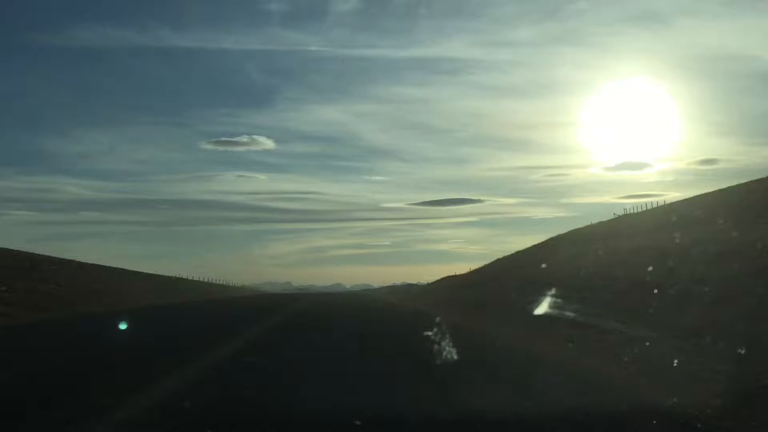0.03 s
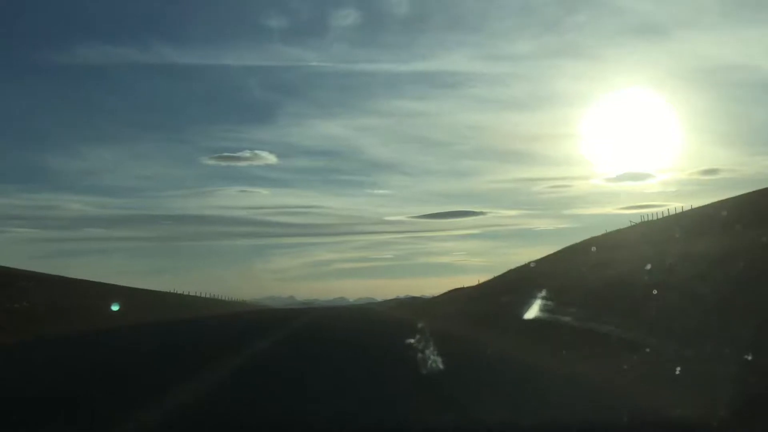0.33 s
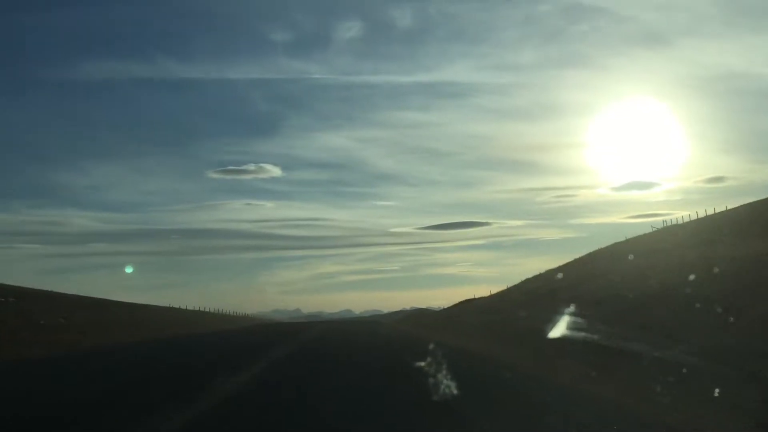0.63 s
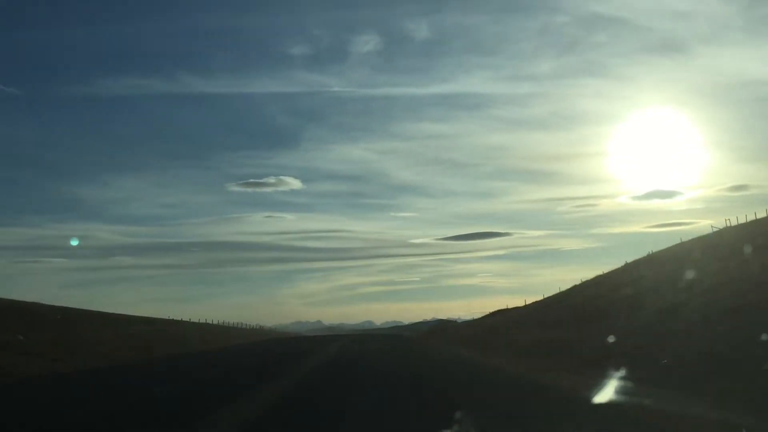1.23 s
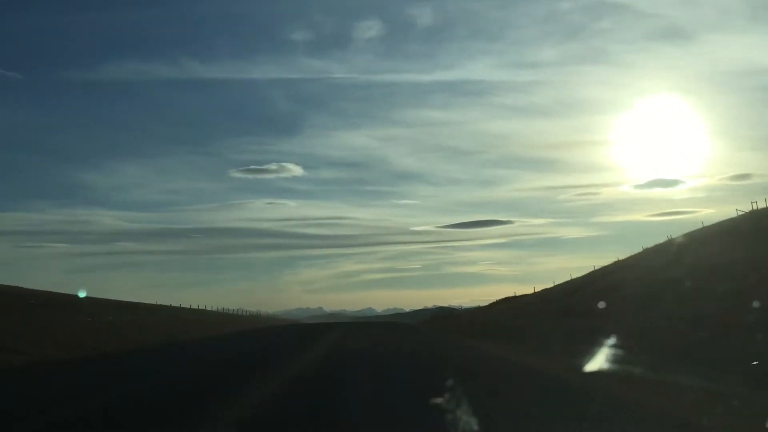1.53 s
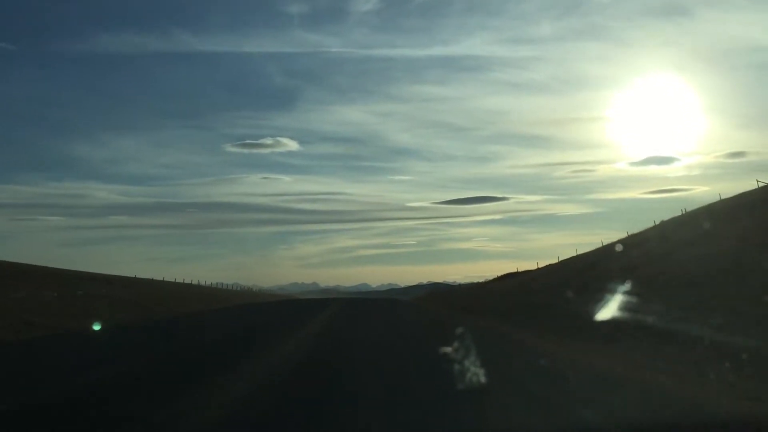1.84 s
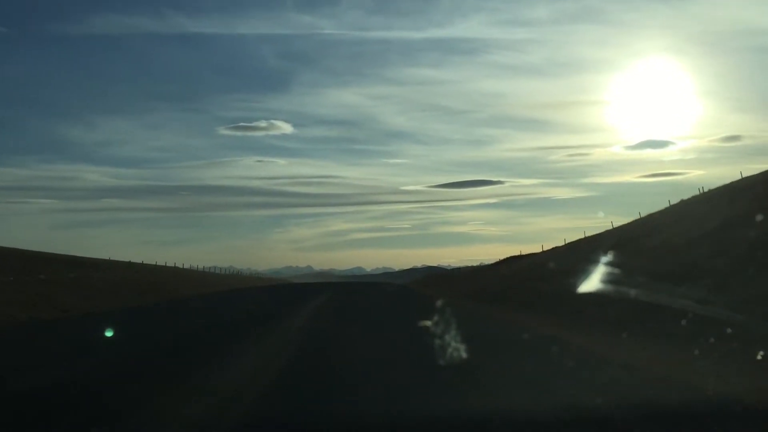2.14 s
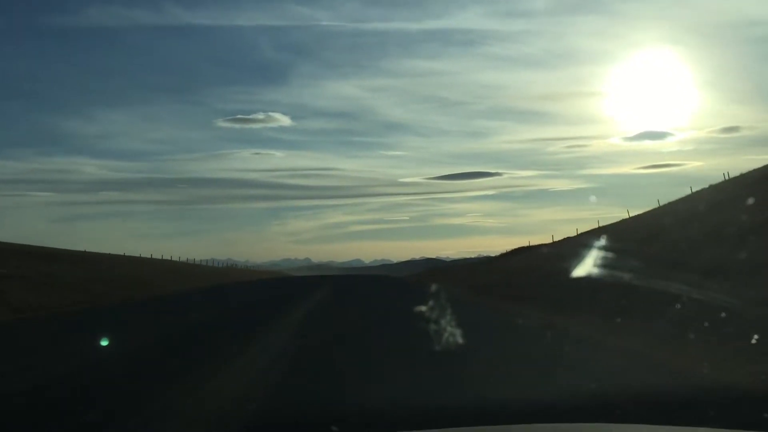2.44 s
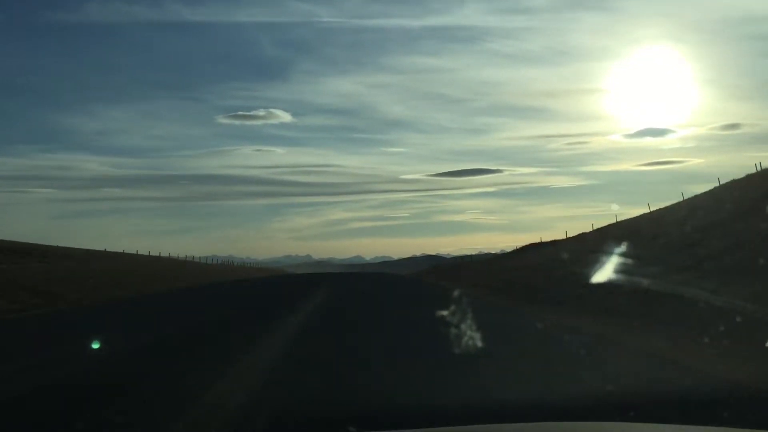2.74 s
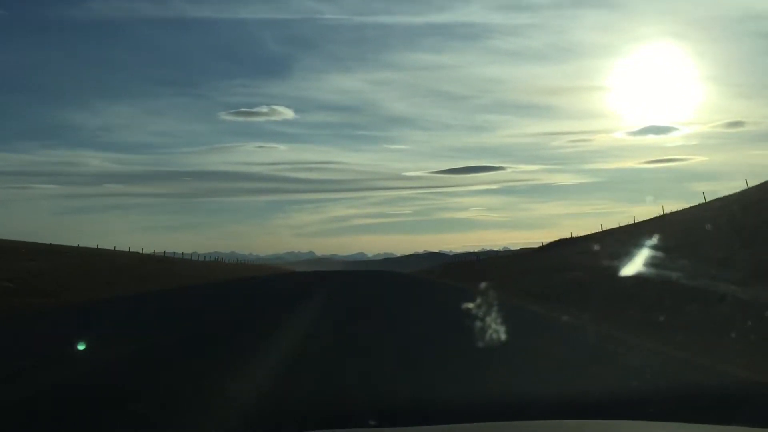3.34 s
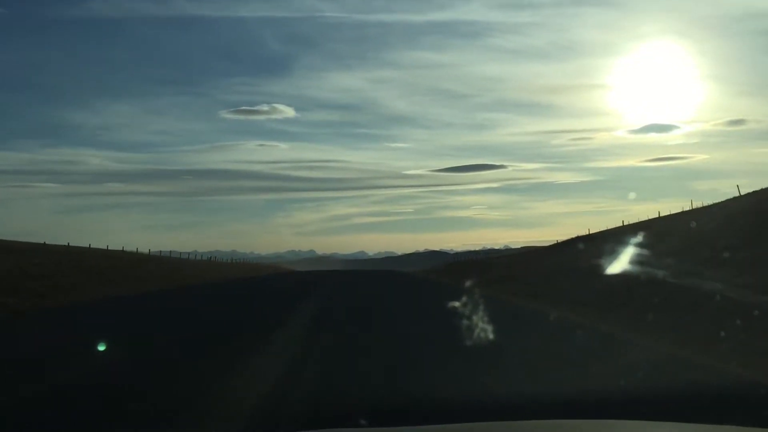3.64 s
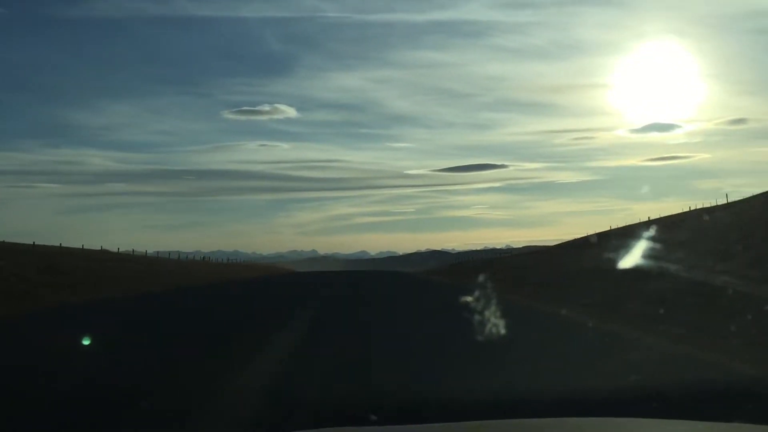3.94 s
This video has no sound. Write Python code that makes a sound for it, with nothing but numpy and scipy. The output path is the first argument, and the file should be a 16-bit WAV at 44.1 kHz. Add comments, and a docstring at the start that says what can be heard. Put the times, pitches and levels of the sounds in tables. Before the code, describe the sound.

A car rumbles deeply along a gravel road throughout, heard from inside, with a soft tyre crunch and faint pattering grit. Small chips tick around 0.4 seconds. From about 0.8 seconds, stones knock and clack irregularly on the underside, ringing briefly, loudest near 1.6, 2.1 and 2.9 seconds. The hollow tyre roar swells just before 2 seconds and stays up until the end at 4 seconds.

```python
"""A deep rumble and a hollow roar fill a car as it drives along a gravel road, heard from inside.
The tyres shake the body, the gravel crunches under the treads, and the roar grows where the road
gets coarser. Fine grit patters throughout, small chips tick in the wheel arches, and larger
stones thrown up by the wheels knock on the floor pan and set it ringing."""
import sys
import numpy as np
from scipy import signal
from scipy.fft import rfft, irfft
from scipy.io import wavfile
from scipy.ndimage import uniform_filter1d

SR = 44100
rng = np.random.default_rng(int(sys.argv[2]) if len(sys.argv) > 2 else 0)


def to_wav(sig):
    """Store sig (one row per channel, or 1-D mono) as 16-bit WAV at the path in sys.argv[1].

    Samples outside -1..1 are clipped; the rate is SR.
    """
    pcm = np.clip(np.atleast_2d(sig), -1, 1) * 32767
    pcm = np.round(pcm).astype(np.int16)
    wavfile.write(sys.argv[1], SR, pcm.T)  # frames by channels


N = 176400

# Tone of the cabin rumble. Each row: frequency in Hz, relative level in dB.
RUMBLE_EQ = [(15, -44.5), (24, -37), (30, -30.5), (37, -4.5), (48, 1), (65, 2), (95, 2.6), (120, -4.5),
             (141, -5), (165, -4), (195, -9.5), (260, -26.5), (400, -77.5), (1000, -110)]
# Tone of the tyre roar through the body. Each row: frequency in Hz, relative level in dB.
ROAR_EQ = [(20, -52.5), (120, -10), (200, -7.5), (235, 2.5), (252, -1.5), (278, 2.5), (310, -5.5),
           (355, -17), (395, -6.5), (445, -13), (510, -11), (600, -16), (690, -16), (790, -30), (900, -34),
           (1100, -45), (1600, -40), (3000, -89), (6000, -110)]
# Tone of the gravel under the treads. Each row: frequency in Hz, relative level in dB.
CRUNCH_EQ = [(300, -26), (500, 0.5), (700, 4), (800, 6.5), (900, 4), (1100, 0.5), (1280, -5), (1450, -10.5),
             (1700, -9), (2150, -14.5), (2600, -18.5), (3500, -27), (4800, -36), (7000, -46.5),
             (10000, -55.5), (15000, -49.5)]
# Fader moves along the road. Each row: time in seconds, then rumble, roar and crunch levels in dB.
ROAD_FADERS = [(.12, -25.3, -36.5, -52), (.8, -24, -38.5, -53.5), (1.25, -23.5, -37, -51.5),
               (1.7, -23, -36.5, -48), (1.9, -21, -29.5, -47), (2.3, -20.5, -31, -46),
               (2.8, -21.5, -32, -46), (3.2, -19, -31.5, -44.5), (3.6, -23.5, -31, -46.5),
               (4, -19, -33, -44)]
# Fader for the body's narrow drone. Each row: time in seconds, level in dB.
DRONE_FADER = [(.12, -53.5), (1.6, -49.5), (2.1, -40), (3.0, -41), (4, -37)]
# Tone of grit and chips. Each row: frequency in Hz, relative level in dB.
GRIT_EQ = [(300, -30), (800, -4), (1600, -3.5), (3500, 5), (5000, -3.5), (6800, -5.5), (10000, -14.5),
           (15000, -23)]
# Ticks in the wheel arches. Each row: start in seconds, level in dB, ring pitch in Hz.
CHIP_HITS = [(.356, -70, 6750), (.371, -79, 6800), (0.464, -72.5, 6900), (.483, -74, 5900),
             (.539, -77.5, 6500), (1.175, -74, 5600), (1.421, -73, 6200), (2.274, -70, 5350),
             (2.419, -70, 6200), (2.678, -73, 6800), (3.083, -71, 6740), (3.348, -68.5, 6300)]
# Knocks on the floor pan. Each row: start in seconds, six band levels in dB from knock to fizz,
# main mode pitch in Hz, its level in dB, two clack pitches in Hz, rattle length in seconds.
STONE_HITS = [(0.748, -62, -66, -69, -72.5, -86.5, -93, 753, -52, 1550, 5600, 0.0088),
              (0.923, -45, -51, -50.5, -61.5, -75, -72, 1250, -47, 1950, 3000, 0.017),
              (0.977, -39, -45, -55.5, -66.5, -77.5, -85, 890, -59, 1700, 3470, 0.012),
              (1.133, -45.5, -52.5, -57.5, -71, -95, -83, 681, -44.5, 2010, 3080, 0.009),
              (1.214, -54, -56, -64, -69, -74, -79, 2050, -56, 1270, 2820, 0.018),
              (1.229, -56, -50, -53, -62, -68, -77, 1190, -48, 2060, 2730, 0.017),
              (1.264, -44.5, -43.5, -54, -63.5, -85, -78, 1296, -39, 1480, 3540, 0.0045),
              (1.475, -46.5, -56, -53, -65, -97, -79, 1244, -42.5, 2450, 3390, 0.0062),
              (1.583, -34, -44.5, -54.5, -62, -71, -77, 910, -36.5, 1680, 3530, 0.011),
              (1.693, -48, -45.5, -46, -50, -55, -56, 2260, -47, 1630, 3980, 0.0039),
              (1.754, -38, -38.5, -44.5, -59, -72, -75, 1720, -46.5, 1620, 3630, 0.013),
              (1.789, -37.5, -43.5, -51, -63.5, -81, -77, 965, -51, 1640, 3520, 0.012),
              (1.851, -41, -48.5, -61, -67.5, -74, -79, 1930, -49.5, 1580, 4200, 0.0098),
              (2.047, -46, -51.5, -57, -55, -75, -73, 1074, -55, 1400, 6100, 0.017),
              (2.072, -51.5, -65, -61, -66, -92, -83, 1880, -62, 1270, 3267, 0.011),
              (2.097, -31.5, -36, -44, -58.5, -75, -79, 1955, -40.5, 1357, 3633, 0.012),
              (2.233, -38.5, -46, -55, -64, -79, -82, 1275, -49, 1700, 3219, 0.013),
              (2.448, -55, -51.5, -56, -67, -93.5, -86, 945, -49, 1390, 2880, 0.0091),
              (2.47, -40.5, -55, -65, -78, -84.5, -90, 880, -45, 1670, 6826, 0.0076),
              (2.567, -37.5, -47, -49, -67, -89, -89, 918, -44.5, 1970, 3530, 0.0078),
              (2.729, -45.5, -55, -49.5, -55, -60.5, -63, 977, -52, 2406, 3472, 0.007),
              (2.942, -30.5, -36, -52, -69.5, -84, -98, 887, -32.5, 1577, 1690, 0.011),
              (3.125, -41, -50.5, -59, -63.5, -76, -85, 1510, -46.5, 1310, 5485, 0.0042),
              (3.229, -42, -54.5, -52.5, -68, -87, -88, 890, -44, 2357, 2990, 0.013),
              (3.284, -48.5, -57.5, -63, -67, -80, -88, 1260, -51, 1986, 3500, 0.013),
              (3.305, -52, -57.5, -58.5, -75, -88, -90, 895, -48, 1990, 3590, 0.0051),
              (3.467, -56, -48, -58.5, -61, -79, -78, 1280, -49, 1485, 3445, 0.0039),
              (3.682, -49.5, -53.5, -60.5, -65, -79, -79.5, 1490, -55.5, 1260, 3900, 0.007),
              (3.864, -46, -50, -72, -74, -86.5, -93.5, 1685, -49, 1570, 5900, 0.0066),
              (3.965, -55, -62, -62, -66, -88, -84, 1270, -61, 1950, 3420, 0.018),
              (3.983, -53, -49.5, -53.5, -70, -73, -83, 914, -49, 1560, 3670, 0.0088)]
# The seven edges of those six bands in Hz, low to high.
BAND_EDGES_HZ = [600, 1150, 2200, 4800, 9500, 12500, 15700]
# Distinct modes of the floor pan. Each row: pitch in Hz, width in Hz, relative level in dB.
PAN_MODES = [(748, 26, 1.5), (897, 69, -1), (930, 11, -6), (1270, 70, -3), (1442, 160, -0.5),
             (1618, 18, 0.5), (1738, 73, 0.5), (2110, 22, -5), (2360, 110, -4), (2837, 67, -2.5),
             (3204, 54, 0), (3410, 23, -9)]
# The wash of dense modes around them. Each row: frequency in Hz, relative level in dB.
PAN_EQ = [(600, -5), (1200, -8.5), (1700, -8.5), (2200, -11), (2700, -3.5), (3600, -5), (4600, -11),
          (5000, -17.5), (6600, -14.5), (9000, -24), (15500, -32)]

RISE_S, PRE_ROLL_S = .0036, .02  # a hit's attack, and room for the lead-in ahead of it
GRIT_RING_S, MAIN_RING_S, RING_AT_1KHZ_S = .0093, .014, .019  # decay time constants


def undb(db):
    """Decibels to gain."""
    return 10 ** (np.asarray(db) / 20)


def unit(x):
    """Scale to rms 1."""
    return x / np.sqrt(np.mean(x ** 2) + 1e-24)


def eq_gain(points, f):
    """Gain at frequencies f from (Hz, dB) points."""
    hz, db = np.array(points, float).T
    return undb(np.interp(np.log(f + 1), np.log(hz), db))


def colour(x, points):
    """EQ x with (Hz, dB) points and bring it to rms 1."""
    return unit(irfft(rfft(x) * eq_gain(points, np.fft.rfftfreq(len(x), 1 / SR)), len(x)))


def resonance(f, hz, width_hz):
    """Response of one damped mode, gain 1 at its centre."""
    return 1j * f * width_hz / (hz ** 2 - f ** 2 + 1j * f * width_hz)


def wobble(per_s):
    """Random drift at rms 1, gliding to per_s new values a second."""
    hold = max(int(SR / per_s), 2)
    steps = np.repeat(rng.standard_normal(N)[:N // hold + 1], hold)
    return unit(uniform_filter1d(steps, hold)[:N])


def faders(table):
    """Each level column of a timed table, drawn out to every sample."""
    times, *columns = np.array(table, float).T
    return [np.interp(np.arange(N) / SR, times, c) for c in columns]


def panel_ripple(spacing_hz=44.64, depth_db=3.5):
    """Fine peaks and dips that the body's dense modes put on the gravel, as (Hz, dB) points."""
    hz = np.arange(1, 900) * spacing_hz
    return np.column_stack([hz, depth_db * rng.standard_normal(len(hz))])


def tyres(ripple, jolt_db=1.1, patchy_db=1.06, grain_db=1):
    """Tyres shake the body and crunch the gravel; bumps swell the roar and crunch together."""
    rumble_db, roar_db, crunch_db = faders(ROAD_FADERS)
    bumps = wobble(per_s=12)
    rumble = colour(rng.standard_normal(N), RUMBLE_EQ) * undb(rumble_db)
    roar = colour(rng.standard_normal(N), ROAR_EQ) * undb(roar_db + jolt_db * bumps)
    grains = rng.standard_normal(N) * undb(grain_db * wobble(per_s=250))
    grains = colour(grains, ripple * [1, .6])  # a shallower dose of the ripple
    crunch = colour(grains, CRUNCH_EQ) * undb(crunch_db + patchy_db * bumps)
    return rumble + roar + crunch


def shaken(hz, width_hz):
    """One resonance driven by random road vibration."""
    mode = resonance(np.fft.rfftfreq(N, 1 / SR), hz, width_hz * 2) ** 2
    return unit(irfft(rfft(rng.standard_normal(N)) * mode, N))


def cabin_resonances():
    """Road vibration keeps the cabin air booming and the body droning and ringing."""
    boom = shaken(hz=134.8, width_hz=15.8) * undb(-32.5)
    drone = shaken(hz=337.3, width_hz=16.6) * undb(faders(DRONE_FADER)[0])
    hollow_ring = shaken(hz=495, width_hz=40) * undb(-48)
    return boom + drone + hollow_ring


def grit(ripple, grains_per_s=110, level_db=-74):
    """Fine grit patters at random, each grain smeared by the cabin into a puff of noise."""
    grains = (rng.random(N) < grains_per_s / SR).astype(float)
    power = signal.lfilter([1], [1, -np.exp(-2 / (GRIT_RING_S * SR))], grains)
    envelope = np.sqrt(np.abs(uniform_filter1d(power, int(RISE_S * SR) + 1)))
    patter = colour(envelope * rng.standard_normal(N), GRIT_EQ)
    return colour(patter, ripple) * undb(level_db)


def strike(t, hold_s, ring_s, lead_in_db=-14, lead_in_s=.004):
    """Envelope of a hit at t = 0: soft lead-in, attack, a hold while the stone rattles, decay."""
    lead_in = undb(lead_in_db) * np.exp(-np.abs(t) / lead_in_s)
    return lead_in + np.clip(t / RISE_S, 0, 1) * np.exp(-np.maximum(t - hold_s, 0) / ring_s)


def chips(ripple, ring_db=4.5, size=4096):
    """Small chips tick in the wheel arches: a puff of grit noise with a narrow, high ring."""
    t, f = np.arange(size) / SR - PRE_ROLL_S, np.fft.rfftfreq(size, 1 / SR)
    grit_tone = eq_gain(GRIT_EQ, f) * eq_gain(ripple, f)
    out = np.zeros(2 * N)
    for start, db, hz in CHIP_HITS:
        arch = grit_tone + undb(ring_db) * resonance(f, hz, width_hz=350)
        tick = unit(irfft(rfft(rng.standard_normal(size)) * arch))
        i = int((start - PRE_ROLL_S) * SR)
        out[i:i + size] += tick * strike(t, hold_s=.026, ring_s=GRIT_RING_S) * undb(db)
    return out[:N]


def causal(gain):
    """The response with this gain that rings only after it is struck."""
    cepstrum = irfft(np.log(gain))
    half = len(cepstrum) // 2
    return np.exp(rfft(np.r_[cepstrum[0], 2 * cepstrum[1:half], np.zeros(half)]))


def knock(t, pan, band_db, main_hz, main_db, clack_hz, hold_s,
          rattle_per_s=386, rattle_db=3, clack_db=-4.5):
    """One stone's uneven contacts ring the pan: a main mode stands out and two more clack."""
    def at_level(x, db):
        """Set the rms of the hit's first 20 ms."""
        return undb(db) * x / np.sqrt(np.mean(x[(t > 0) & (t < .02)] ** 2))

    def ring(hz, ring_s):
        """One struck mode of the panel."""
        return strike(t, hold_s, ring_s) * np.sin(2 * np.pi * (hz * t + rng.random()))

    contacts = np.interp((t - t[0]) * rattle_per_s, np.arange(len(t)), rng.standard_normal(len(t)))
    rattle = rng.standard_normal(len(t)) * undb(rattle_db * contacts)
    out = at_level(ring(main_hz, MAIN_RING_S), main_db)
    for lo, hi, db in zip(BAND_EDGES_HZ, BAND_EDGES_HZ[1:], band_db):
        ring_s = RING_AT_1KHZ_S * (np.sqrt(lo * hi) / 1000) ** -.28  # the treble dies first
        force = rattle * strike(t, hold_s, ring_s)
        bandpass = signal.butter(4, [lo, hi], "band", fs=SR, output="sos")
        band = at_level(signal.sosfilt(bandpass, irfft(rfft(force) * pan)), 0)
        clack = sum(at_level(ring(hz, ring_s), clack_db) for hz in clack_hz if lo <= hz < hi)
        out += at_level(band + clack, db)
    return out


def stones(ripple, size=8192):
    """Larger stones hit the underside, all ringing through the same floor pan."""
    t, f = np.arange(size) / SR - PRE_ROLL_S, np.fft.rfftfreq(size, 1 / SR)
    wash = causal(eq_gain(PAN_EQ, f) * eq_gain(ripple, f))
    pan = wash + sum(undb(db) * resonance(f, hz, width) for hz, width, db in PAN_MODES)
    out = np.zeros(2 * N)
    for start, *band_db, main_hz, main_db, low_hz, high_hz, hold_s in STONE_HITS:
        i = int((start - PRE_ROLL_S) * SR)
        out[i:i + size] += knock(t, pan, band_db, main_hz, main_db, (low_hz, high_hz), hold_s)
    return out[:N]


def scene():
    """The mono mix from the front seat: a bed of road noise with gravel hits on top."""
    ripple = panel_ripple()
    bed = tyres(ripple) + cabin_resonances()
    return (bed + stones(ripple) + chips(ripple) + grit(ripple))[None]


def record(dry, hiss_db=-80.5, open_s=.12, top_hz=15800):
    """Add faint hiss, snap the sound on after a moment of silence and cut the very top."""
    gate = np.clip((np.arange(N) / SR - open_s) / .002, 0, 1)
    hiss = undb(hiss_db) * rng.standard_normal(N)
    lowpass = signal.ellip(10, .2, 80, top_hz, fs=SR, output="sos")
    return signal.sosfilt(lowpass, (dry + hiss) * gate)


dry = scene()
out = record(dry)
to_wav(out)
```